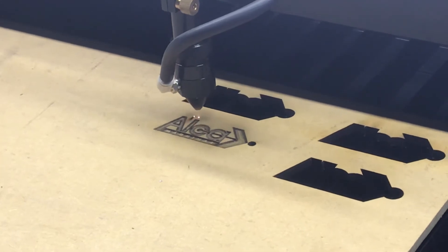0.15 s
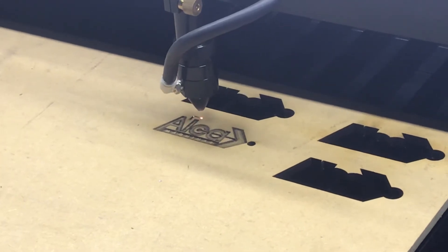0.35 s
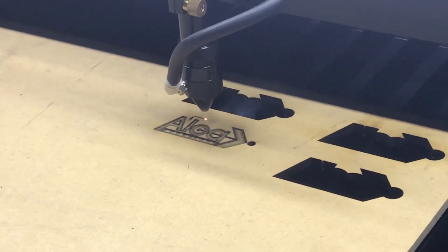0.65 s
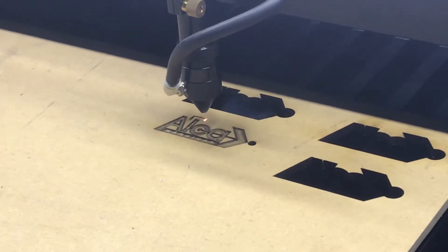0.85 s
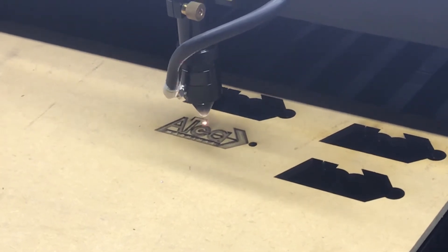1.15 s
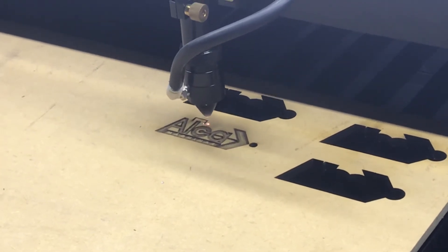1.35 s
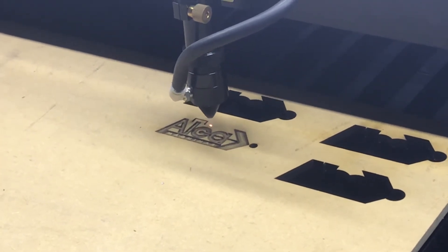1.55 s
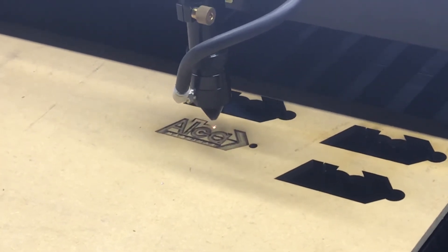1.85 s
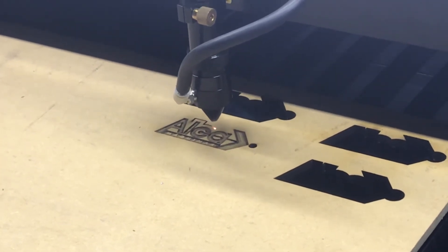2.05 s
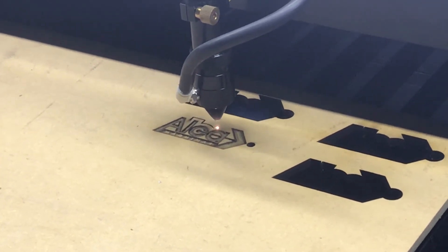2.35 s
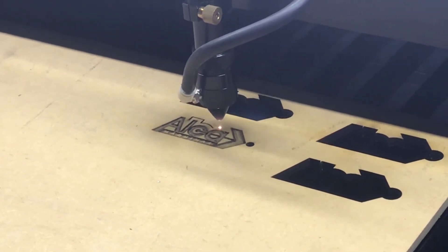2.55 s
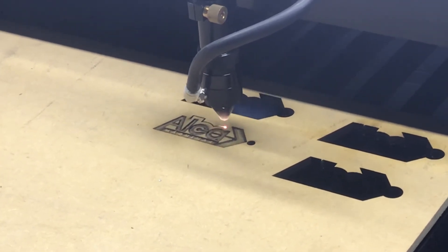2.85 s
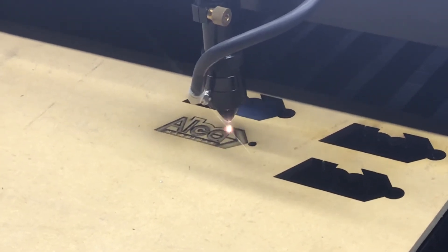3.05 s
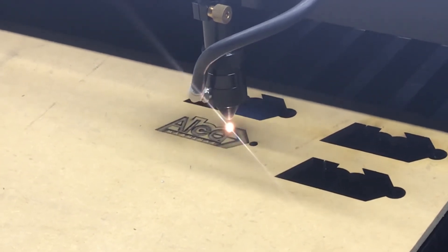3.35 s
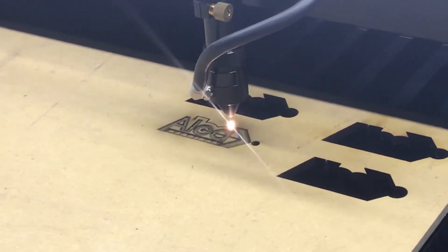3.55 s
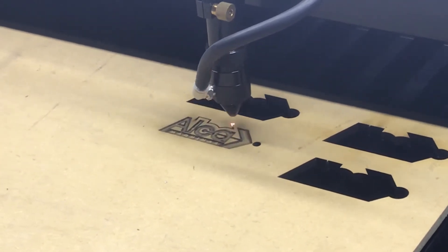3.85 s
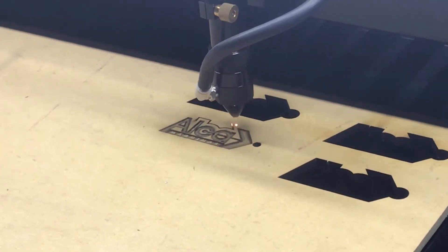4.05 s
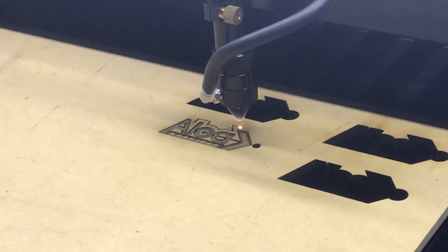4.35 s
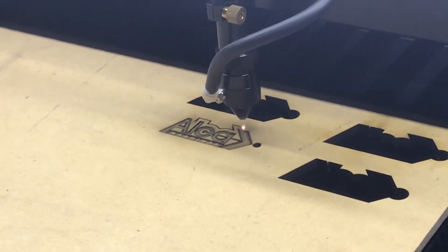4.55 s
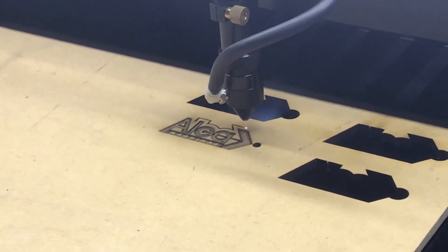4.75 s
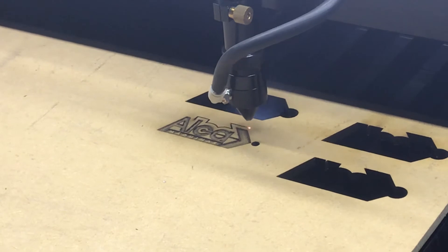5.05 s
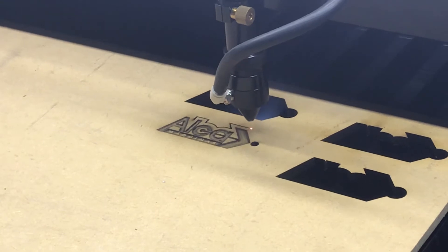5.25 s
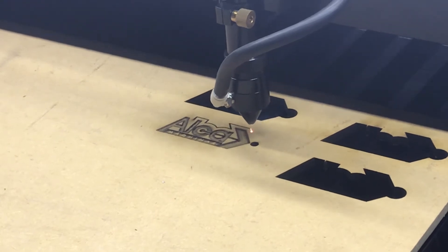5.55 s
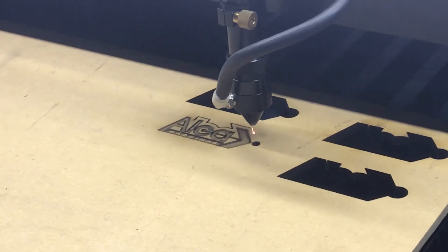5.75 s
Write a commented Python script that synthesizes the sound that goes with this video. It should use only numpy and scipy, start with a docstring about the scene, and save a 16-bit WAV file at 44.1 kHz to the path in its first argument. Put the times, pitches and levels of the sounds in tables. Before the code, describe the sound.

Constant low machine drone with swelling bass rumble and a steady blower note around 356 hertz, with thin air-jet hiss far beneath.

```python
"""Laser cutter under its lid

One microphone hears the cutter through its lid. In the background, noise shaped by the duct rumbles and swells;
the six-bladed exhaust blower sings one clear tone over it, as sines on multiples of the shaft speed.
A mains-driven air pump hums on multiples of its stroke and feeds a jet at the nozzle: four ranges of noise
whose hiss pulses with the pump and changes colour as the jet passes over solid sheet and cut grooves."""
import sys
import numpy as np
from scipy import signal
from scipy.fft import rfft, irfft, next_fast_len
from scipy.io import wavfile
from scipy.ndimage import uniform_filter1d, map_coordinates

SR = 44100
rng = np.random.default_rng(int(sys.argv[2]) if len(sys.argv) > 2 else 0)


def to_wav(sig):
    """Store sig (one row per channel, or 1-D mono) as 16-bit WAV at the path in sys.argv[1].

    Samples outside -1..1 are clipped; the rate is SR.
    """
    pcm = np.clip(np.atleast_2d(sig), -1, 1) * 32767
    pcm = np.round(pcm).astype(np.int16)
    wavfile.write(sys.argv[1], SR, pcm.T)  # frames by channels


N = 260631

SHAFT_HZ, PUMP_HZ = 59.325, 59.93  # blower turns and pump strokes a second
SWELL_DB, SWELL_RATE = 1.7, 7  # random swell of the rumble: depth [dB], knots a second
TOP_HZ = 15750  # band limit of the recorder

# moving air in the duct: (frequency [Hz], relative density [dB])
DUCT_SPECTRUM = [(12, -47), (27, -41.5), (45, -21.5), (75, -11), (150, -10.5), (218, -12), (235, -20.5),
                 (280, -27.5), (300, -21.5), (390, -20.5), (410, -30.5), (650, -37.5), (820, -41.5),
                 (950, -44.5), (2500, -58.5)]
# duct and cabinet resonances and cancellations: (centre [Hz], width [Hz], lift or cut [dB])
CABINET_MODES = [(33.4, 4, 8.5), (50, 6.2, 3), (69.7, 8, -7), (95.7, 8.4, 12), (108.6, 5.2, -10),
                 (138.2, 12, 5), (161.2, 9.3, -7), (182.5, 12, 2.5), (236, 8, -4.5), (334, 11, -2),
                 (365, 21, 3.5), (410, 9, 0), (454, 12, 0.5), (486, 33, 3.5), (598, 11, 4.5),
                 (645, 33, -5.5), (670, 52, 3.5), (785, 46, 4.5), (1078, 45, 8.5), (1144, 43, 10),
                 (1239, 46, 10.5), (1430, 140, 3.5), (1645, 49, 4)]
# blower tones; six blades make 6, 12 and 18 the blade tones: (multiple of shaft speed: rms level [dB])
BLOWER_TONES = {1: -49, 2: -44, 5: -65.5, 6: -32.5, 7: -63.5, 12: -55.5, 18: -69.5}
# pump hum: (multiple of stroke rate: rms level [dB])
PUMP_TONES = {1: -47.5, 3: -50, 5: -62.5, 7: -60, 9: -67.5}
# jet colour, lowest range: (frequency [Hz], relative density [dB])
JET_LOW_SPECTRUM = [(1200, -36.5), (1700, -7.5), (2600, -4), (4300, -5.5), (4700, -9.5), (5300, -40)]
# jet colour, middle range: (frequency [Hz], relative density [dB])
JET_MID_SPECTRUM = [(4000, -42.5), (4800, -2.5), (5800, -0.5), (6900, -4), (7600, -9), (8300, -42)]
# jet colour, upper range: (frequency [Hz], relative density [dB])
JET_TOP_SPECTRUM = [(7000, -39.5), (7800, -4.5), (9300, 0), (10100, -2), (10500, -10.5), (11000, -42)]
# jet colour, highest and thinnest range: (frequency [Hz], relative density [dB])
JET_THIN_SPECTRUM = [(10000, -38), (10500, -4), (11300, 0), (13200, -1.5), (15600, -2), (17000, -5)]
# resonances of the space under the lid: (centre [Hz], width [Hz], lift or cut [dB])
LID_MODES = [(1910, 70, 6.5), (2200, 70, 4.5), (2882, 120, 7.5), (3000, 40, 2.5), (3190, 40, 3.5),
             (3360, 88, 5.5), (3490, 100, 0.5), (3760, 79, 7), (3940, 45, 4), (4050, 46, 3.5),
             (4200, 97, 4.5), (5190, 66, 3), (5570, 210, 4), (5980, 98, 6.5), (6420, 150, 4),
             (7310, 100, 7), (8700, 120, 3.5), (9390, 160, 1), (11700, 150, -1.5), (12800, 300, 2),
             (14000, 150, 0.5)]
# bright hiss, of which only the swing about the mean is used: (time [s], level [dB])
BRIGHT_LEVEL = [(0.05, -70), (0.31, -72), (0.74, -71.5), (0.94, -69), (1.66, -71), (2.33, -70.5),
                (2.73, -73), (3.17, -72), (3.28, -69), (3.83, -71.5), (3.94, -71.5), (5.24, -73),
                (5.64, -71), (5.85, -71.5)]
# low hiss, of which only the swing about the mean is used: (time [s], level [dB])
LOW_LEVEL = [(0.05, -63.5), (0.32, -65), (2.08, -63), (3.98, -63.5), (4.02, -65), (5.82, -65.5),
             (5.85, -66.5)]
# hiss ranges by name: (mean level [dB], share of bright swing, share of low swing, drift as the head travels [dB/s])
HISS_RANGES = {"low": (-65, 0.16, 1.25, 0.17), "mid": (-70.5, 1, 0.4, -0.14), "top": (-74, 1.1, 0.6, 0.2),
               "thin": (-74, 0.9, -0.1, 0.03)}


def amp(db):
    """Decibels to gain."""
    return 10 ** (np.asarray(db) / 20)


def unit(x):
    """Scaled to rms 1."""
    return x / np.sqrt(np.mean(x ** 2) + 1e-20)


def wobble(rate):
    """A smooth random curve through normal draws, rate knots a second."""
    knots = rng.standard_normal(int(N * rate / SR) + 4)
    return map_coordinates(knots, [np.arange(N) * rate / SR])


def filtered(x, response):
    """x times a response of frequency."""
    size = next_fast_len(N + 8192)
    hz = np.fft.rfftfreq(size, 1 / SR)
    return irfft(rfft(x, size) * response(hz), size)[..., :N]


def patched(x, depth_db, size, bins, frames):
    """x under a random gain field that is smooth over some bins and frames."""
    spectrogram = signal.stft(x, nperseg=size)[2]
    field = rng.standard_normal(spectrogram.shape)
    for _ in range(2):
        field = uniform_filter1d(field, size=bins, axis=0)
        field = uniform_filter1d(field, size=frames, axis=1)
    gain = amp(depth_db * unit(field))
    return signal.istft(spectrogram * gain, nperseg=size)[1][:N]


def air(spectrum, modes, patchy_db):
    """Turbulence: patchy noise of rms 1, coloured by a spectrum and lifted or cut at modes."""
    noise = patched(rng.standard_normal(N), patchy_db, size=1024, bins=6, frames=6)
    freqs, levels = np.transpose(spectrum)

    def colour(hz):
        # straight lines over log frequency, near silence outside the table
        base_db = np.interp(np.log(hz + 1), np.log(freqs), levels, -120, -120)
        modes_db = sum(db / (1 + (2 * (hz - centre) / width) ** 2) for centre, width, db in modes)
        return amp(base_db + modes_db)

    return unit(filtered(noise, colour))


def hum(phase, orders, waver_db):
    """Sines on multiples of a rotation, each wavering in strength."""
    total = 0
    for k, db in orders.items():
        strength = np.sqrt(2) * amp(db + waver_db * wobble(9))  # sqrt(2): rms to peak
        total = total + strength * np.sin(k * phase + 2 * np.pi * rng.random())
    return total


def duct_rumble():
    """Turbulent air in the duct, whose bass swells at random."""
    duct = amp(-32) * air(DUCT_SPECTRUM, CABINET_MODES, patchy_db=0.58)
    bass = filtered(duct, lambda hz: 1 / (1 + (hz / 250) ** 8))
    swell = amp(SWELL_DB * wobble(SWELL_RATE))
    return duct + (swell - 1) * bass  # only the bass swells


def blower_tones():
    """Shaft and blade tones of the exhaust blower, on a nearly steady shaft."""
    t = np.arange(N) / SR
    turn = 2 * np.pi * SHAFT_HZ * t + 0.017 * wobble(2)  # phase [rad]
    return hum(turn, BLOWER_TONES, waver_db=0.5)


def pump_hum(stroke):
    """The mains-driven pump hums on odd multiples of its stroke rate."""
    return hum(stroke, PUMP_TONES, waver_db=1.5)


def swing(points):
    """A level curve around its own mean, in dB."""
    level = np.interp(np.arange(N) / SR, *np.transpose(points))
    return level - level.mean()


def under_lid(x, depth_db):
    """The closed box has countless narrow peaks and dips, which drift slowly as the head travels."""
    return unit(patched(x, depth_db, size=4096, bins=2, frames=30)) * np.std(x)


def jet_hiss(stroke):
    """Each pump stroke pushes the nozzle jet a little harder; two slow levels colour its hiss."""
    travel_s = (np.arange(N) - N / 2) / SR  # zero halfway through
    bright, low = swing(BRIGHT_LEVEL), swing(LOW_LEVEL)
    # (range, spectrum, patchiness of the air [dB], depth of the lid's peaks and dips [dB])
    layers = [("low", JET_LOW_SPECTRUM, 0.46, 2.1), ("mid", JET_MID_SPECTRUM, 1.15, 2.5),
              ("top", JET_TOP_SPECTRUM, 1.4, 2.1), ("thin", JET_THIN_SPECTRUM, 2.0, 1.5)]
    hiss = np.zeros(N)
    for name, spectrum, patchy_db, depth_db in layers:
        mean_db, bright_share, low_share, drift = HISS_RANGES[name]
        level_db = mean_db + bright_share * bright + low_share * low + drift * travel_s
        hiss += amp(level_db) * under_lid(air(spectrum, LID_MODES, patchy_db), depth_db)
    pulse_db = 0.65 * np.sin(stroke) + 0.26 * wobble(12)
    return amp(pulse_db) * hiss


def pump_and_jet():
    """One pump stroke drives both the hum and the pulse of the jet."""
    stroke = 2 * np.pi * PUMP_HZ * np.arange(N) / SR  # phase [rad]
    return pump_hum(stroke) + jet_hiss(stroke)


def scene():
    """All sources, heard through the lid by one microphone."""
    return (duct_rumble() + blower_tones() + pump_and_jet())[None]


def record(dry):
    """The recorder keeps nothing from its band limit upward."""
    return filtered(dry, lambda hz: hz < TOP_HZ)


dry = scene()
out = record(dry)
to_wav(out)
```